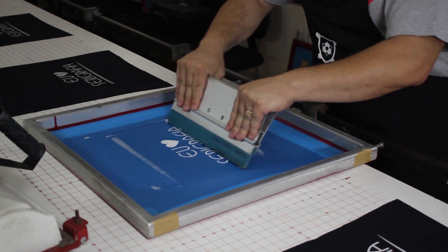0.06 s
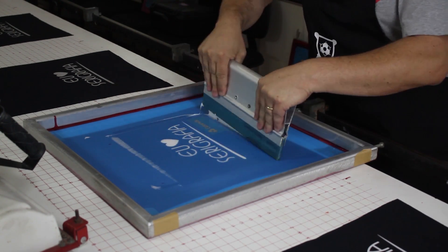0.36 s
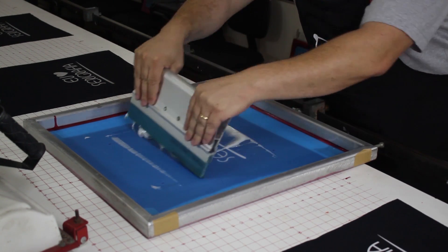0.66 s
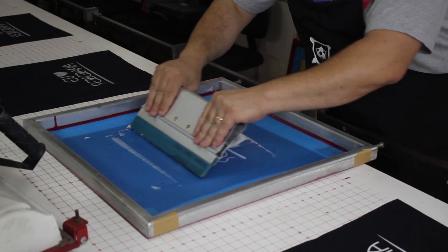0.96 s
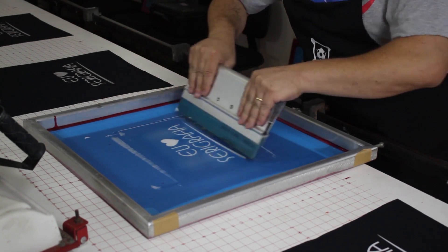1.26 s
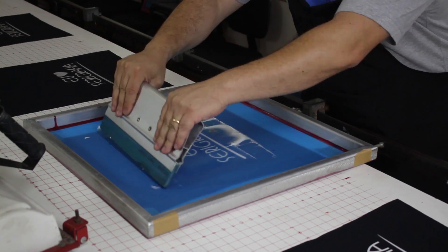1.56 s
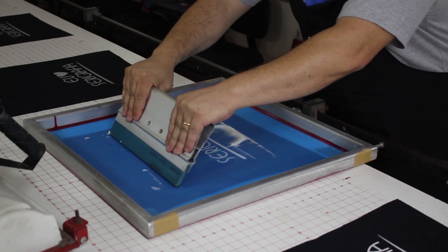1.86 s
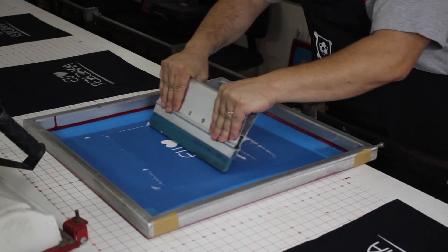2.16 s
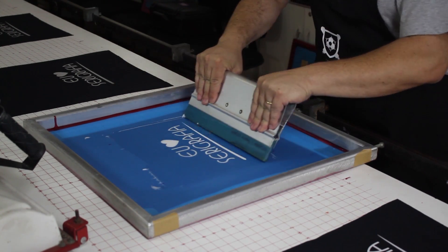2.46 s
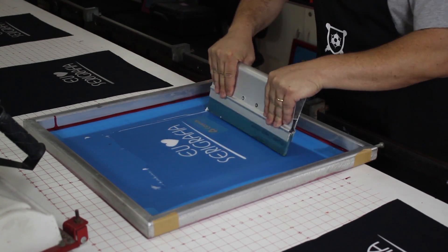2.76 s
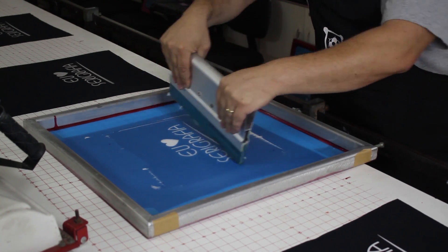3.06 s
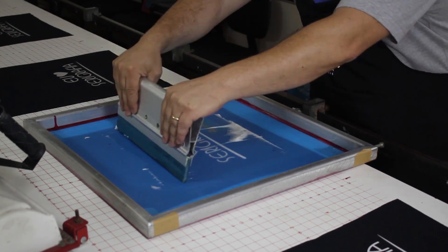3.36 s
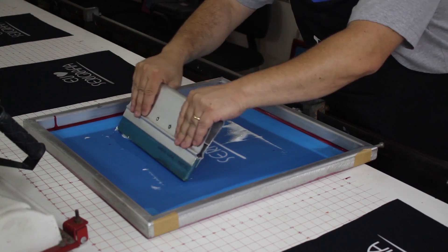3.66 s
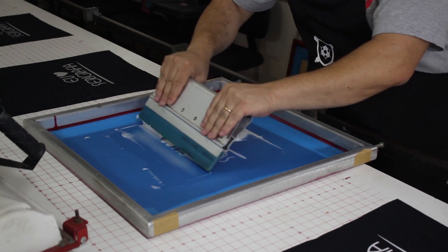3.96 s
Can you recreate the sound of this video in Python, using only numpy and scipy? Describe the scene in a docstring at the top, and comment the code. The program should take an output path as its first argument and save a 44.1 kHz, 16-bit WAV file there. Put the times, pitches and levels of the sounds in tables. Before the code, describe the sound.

Gliding rubber squeaks come from a squeegee rubbing back and forth on screen mesh, broken by low thumps and a knock. Softer squeaks follow, centred in a slightly echoing workshop with a faint motor hum and whine.

```python
"""A rubber squeegee is pushed and pulled over the taut mesh of a printing screen in a workshop.
The blade first sticks and slips in gliding squeaks, rasping over the weave. At the turns it thumps
the screen like a drum: at 0.8 s, then twice near 1.65 s, with a faint, high squeak between.
A run of squeaks falls from 2.1 s, with a thump and knock at 2.4 s; softer ones follow to the end.
Throughout, a motor hums and whines, and the room rings after every stroke."""
import sys
import numpy as np
from scipy import signal
from scipy.fft import rfft, irfft
from scipy.io import wavfile

SR = 44100
rng = np.random.default_rng(int(sys.argv[2]) if len(sys.argv) > 2 else 0)


def transcribe(u):
    """Save the signal u as a 16-bit wav file named by the first command-line argument.

    u: samples, shape (n,) or (channels, n), limited to [-1, 1]; the rate is SR.
    q: integer samples, one column per channel.
    """
    v = np.clip(np.atleast_2d(u).T, -1, 1)
    q = np.round(v * 32767).astype(np.int16)
    wavfile.write(sys.argv[1], SR, q)


N = 176400

# Blade strokes: overtone_db, half_pitch_db, rasp_db, roughness (0-1), [time_s, pitch_hz, level_db]
BLADE_STROKES = [ (-11.5, -21, -11.5, 1, [(0, 2720, -28), (.02, 2760, -27), (.04, 2480, -28),
                 (.056, 2540, -27), (.068, 2300, -33), (.079, 3020, -29), (.112, 2860, -26),
                 (.135, 2350, -27), (.158, 2400, -34), (.168, 1620, -28), (.19, 2270, -30),
                 (.22, 2230, -31), (.26, 2650, -31), (.303, 2480, -31), (.33, 1780, -42)]),
                 (-17, -27, -8, .6, [(.725, 2600, -49), (.755, 2430, -42), (.778, 2150, -40),
                 (.802, 1500, -40)]), (-8, -17, -3.5, 1, [(.95, 1390, -49), (1.02, 2350, -47.5),
                 (1.064, 3330, -45), (1.1, 3650, -40), (1.135, 3880, -35), (1.185, 3600, -40),
                 (1.235, 2300, -45)]), (-10, -20, -5, .5, [(1.9, 1500, -56), (2.02, 1680, -46),
                 (2.06, 1830, -44), (2.108, 2110, -39)]), (-11, -26, -16, .9, [(2.108, 2100, -35),
                 (2.121, 2160, -25), (2.138, 2260, -26), (2.145, 1900, -31), (2.158, 2030, -26),
                 (2.19, 2080, -27), (2.2, 2360, -28), (2.22, 2390, -25.5), (2.255, 2120, -35)]),
                 (-13, -25, -13.5, .7, [(2.264, 1480, -30), (2.277, 1900, -27), (2.29, 1730, -31),
                 (2.322, 1560, -33), (2.347, 2050, -32), (2.365, 1780, -30), (2.398, 1600, -27),
                 (2.412, 1300, -31), (2.44, 1750, -29), (2.474, 1100, -30), (2.502, 1660, -29),
                 (2.54, 1300, -31), (2.577, 1440, -30), (2.592, 1020, -34), (2.612, 660, -41)]),
                 (-19, -10, -4.5, 1, [(2.62, 750, -46), (2.66, 1350, -42), (2.696, 2050, -34),
                 (2.73, 1300, -46)]), (-10, -22, -8, .5, [(2.968, 2650, -47), (3.015, 2950, -42),
                 (3.04, 3050, -52)]), (-6, -7, -6, 1, [(3.133, 3820, -44), (3.148, 4000, -41.5),
                 (3.183, 3700, -44), (3.198, 3170, -48), (3.218, 3020, -46), (3.252, 3200, -44),
                 (3.285, 2550, -56), (3.312, 1820, -45), (3.37, 1450, -50)]),
                 (-24, -30, -16, .25, [(3.8, 850, -49), (3.85, 1350, -43), (3.868, 1720, -35.5),
                 (3.9, 1990, -42.5), (3.97, 1520, -49)])]
JITTER_HZ, JITTER_RATE_HZ = 46, 220
FLUTTER_DB, FLUTTER_RATE_HZ = 4.1, 150
FUZZ_DB, FUZZ_RATE_HZ = -8, 420
CHATTER_DB, CHATTER_RATE_HZ = 7, 45
TOUCH_S, PARTIAL_STEP_DB = .005, -10
# Screen radiation of overtones, chatter and rasp: freq_hz, gain_db
SCREEN_RADIATION = [(2700, 0), (3700, -6.5), (4600, 1.5), (5300, .5), (6500, -7), (7500, -4), (9500, -10)]
# Rubber on the weave, slipping at RASP_REF_HZ: freq_hz, relative_db
RASP_SPECTRUM = [(200, 3), (700, 2.5), (2200, 11), (5000, 7), (16000, -4.5)]
RASP_REF_HZ, RASP_SHIFT_EXPONENT = 2300, 0.61
GRAIN_DB, GRAIN_RATE_HZ = 3.6, 330
# Light blade skims: start_s, length_s, level_db
BLADE_SWISHES = [(0.709, 0.07, -48.5), (1, 0.29, -45.5), (1.849, 0.31, -48), (2.62, .3, -51.5)]
SWISH_SLIP_HZ = 5960
# Blade landings on the mesh: start_s, level_db, pitch_hz, t60_s
LANDINGS = [(0.837, -13.5, 137, 0.079), (1.6463, -8.5, 157, 0.033), (1.6711, -4.5, 131, 0.067),
            (2.430, -17, 138, 0.055)]
# Screen modes: freq_hz, relative_db, t60_s
SCREEN_MODES = [(108.8, -20, 0.84), (172, -14.5, 0.32), (272.3, -16, 0.14)]
THUMP_RISE_S, FRAME_LOW_CUT_HZ = 0.0014, 108
# Handle knocks and blade ticks: start_s, level_db, centre_hz, width_oct, t60_s
TICK_BURSTS = [(.045, -33, 3400, .15, 0.022), (0.144, -24.5, 3150, 0.12, 0.019),
               (0.168, -32, 4000, 0.65, .05), (1.215, -33, 3980, 0.53, 0.083),
               (1.631, -38, 2500, 0.51, 0.045), (2.195, -30, 3040, 0.27, 0.024),
               (2.374, -27, 2470, .25, .03), (2.411, -38, 6100, 0.43, 0.033),
               (2.430, -17.5, 487, 0.39, 0.062), (2.431, -21.5, 2430, 0.66, 0.025),
               (2.774, -43, 6000, .33, .02), (2.966, -33.5, 6400, 1, 0.016)]
# Mesh rumble envelope: time_s, level_db
RUMBLE_LEVEL = [(0, -29), (.2, -31.5), (.35, -37), (.85, -42), (.9, -37.5), (1.04, -42.5), (1.6, -41),
                (1.75, -32.5), (1.94, -33), (2.06, -38), (2.35, -32.5), (2.6, -36.5), (3.5, -46),
                (3.78, -40)]
# Mesh rumble: freq_hz, relative_db
RUMBLE_SPECTRUM = [(30, -13), (70, 2.5), (110, 6.5), (220, 2), (400, 2.5), (700, -8.5), (1500, -21),
                   (5000, -38)]
# Motor hum and whine: freq_hz, level_db
MOTOR_LINES = [(119.6, -48), (178, -51), (242, -54), (435, -49), (2767, -57), (2826, -60)]
MOTOR_WAVER_DB, MOTOR_DRIFT_HZ = 2, .8
# Workshop air: freq_hz, relative_db
AIR_SPECTRUM = [(25, -26), (60, -1), (120, -23), (200, -2), (430, -0.5), (630, -1.5), (830, -7.5),
                (1270, -9.5), (2400, -19), (2830, -14), (3300, -22), (4800, -20), (7000, -28),
                (15500, -34.5)]
# Stereo hiss: freq_hz, relative_db
HISS_SPECTRUM = [(500, -15), (2000, -26.5), (6000, -1), (16000, -0.5)]
AIR_DB, HISS_DB = -37.5, -56
# Room decay: freq_hz, t60_s
ROOM_DECAY = [(100, 0.59), (1400, 0.74), (2600, 1), (3700, .9), (5500, 0.5)]
BLADE_SEND_DB, THUMP_SEND_DB, EARLY_DB = -7.5, -9, -10
BAND_LIMIT_HZ = 15750


def squeak(overtone_db, half_pitch_db, rasp_db, roughness, curve):
    """Stick-slip of the rubber edge: fluttering tone, overtones, fits of half-pitch chatter, rasp."""
    t = np.arange(N) / SR
    time_s, pitch_hz, level_db = np.transpose(curve)
    gate = np.clip(np.minimum(t - time_s[0], time_s[-1] - t) / TOUCH_S + 1, 0, 1)
    envelope = gate * amp(np.interp(t, time_s, level_db))
    slip_hz = np.interp(t, time_s, pitch_hz)
    jitter_hz = roughness * JITTER_HZ * wander(JITTER_RATE_HZ)
    phase = 2 * np.pi * np.cumsum(slip_hz + jitter_hz) / SR
    flutter = lambda: unit_rms(amp(roughness * FLUTTER_DB * wander(FLUTTER_RATE_HZ)))
    fuzz = roughness * amp(FUZZ_DB) * wander(FUZZ_RATE_HZ)
    partial = lambda ratio: amp(lookup(SCREEN_RADIATION, ratio * slip_hz)) * np.sin(ratio * phase)
    overtones = partial(2) + amp(PARTIAL_STEP_DB) * partial(3)
    halves = partial(1.5) + amp(PARTIAL_STEP_DB) * (partial(.5) + partial(2.5))
    chatter = unit_rms(amp(CHATTER_DB * np.tanh(wander(CHATTER_RATE_HZ))))
    tone = (flutter() + fuzz) * np.sin(phase)
    tone += flutter() * (amp(overtone_db) * overtones + amp(half_pitch_db) * chatter * halves)
    return envelope * (np.sqrt(2) * tone + amp(rasp_db) * rasp(pitch_hz.mean()))


def rasp(slip_hz):
    """Grainy rubbing on the weave, brighter with faster slip."""
    shift = (slip_hz / RASP_REF_HZ) ** RASP_SHIFT_EXPONENT
    rubbing = noise(lambda f: amp(lookup(RASP_SPECTRUM, f / shift) + lookup(SCREEN_RADIATION, f)))
    grain = unit_rms(amp(GRAIN_DB * wander(GRAIN_RATE_HZ)))
    return rubbing * grain


def swishes():
    """Blade skims the weave at low pressure: soft swells of bright rasp."""
    out = np.zeros(N)
    for start_s, length_s, level_db in BLADE_SWISHES:
        swell = np.sqrt(np.hanning(int(length_s * SR)))
        add(out, start_s, amp(level_db) * swell * rasp(SWISH_SLIP_HZ)[:len(swell)])
    return out


def thumps():
    """Damped push on the mesh, then longer screen modes; the open frame radiates no deep bass."""
    out, t = np.zeros(N), np.arange(SR) / SR
    attack = np.minimum(t / THUMP_RISE_S, 1)
    ring = sum(amp(db - 60 * t / t60_s) * np.sin(2 * np.pi * hz * t) for hz, db, t60_s in SCREEN_MODES)
    for start_s, level_db, pitch_hz, t60_s in LANDINGS:
        push = amp(-60 * t / t60_s) * np.sin(2 * np.pi * pitch_hz * t)
        add(out, start_s, amp(level_db) * attack * (push + ring))
    return signal.sosfilt(signal.butter(4, FRAME_LOW_CUT_HZ, "high", fs=SR, output="sos"), out)


def ticks():
    """Handle knocks or blade snaps free: short bursts of band noise."""
    out, t = np.zeros(N), np.arange(SR // 4) / SR
    attack = np.minimum(t / 0.0004, 1)
    for start_s, level_db, centre_hz, width_oct, t60_s in TICK_BURSTS:
        burst = noise(lambda f: np.exp(-.5 * (np.log2((f + 1) / centre_hz) / width_oct) ** 2))
        add(out, start_s, burst[:len(t)] * attack * amp(level_db - 60 * t / t60_s))
    return out


def rumble():
    """Mesh rumbles under the pressed, moving blade."""
    level_db = np.interp(np.arange(N) / SR, *np.transpose(RUMBLE_LEVEL))
    return amp(level_db) * coloured(RUMBLE_SPECTRUM)


def motor():
    """Hum and whine: sine lines wavering in level and pitch."""
    out, t = np.zeros(N), np.arange(N) / SR
    for freq_hz, level_db in MOTOR_LINES:
        rms = amp(level_db + MOTOR_WAVER_DB * wander(rate_hz=7.2))
        drift_cycles = MOTOR_DRIFT_HZ * np.cumsum(wander(rate_hz=4.5)) / SR
        out += np.sqrt(2) * rms * np.sin(2 * np.pi * (freq_hz * t + drift_cycles))
    return out


def air():
    """Steady workshop air, plus thin hiss in antiphase between the ears."""
    hiss = amp(HISS_DB) * coloured(HISS_SPECTRUM)
    return amp(AIR_DB) * coloured(AIR_SPECTRUM) + np.array([hiss, -hiss])


def room(x):
    """Five reflections off table and press, then a diffuse tail."""
    t = np.arange(SR) / SR
    onset = np.clip(t / 0.016 - .5, 0, 1)
    freq_hz, time_s, spectra = signal.stft(rng.standard_normal(SR) * onset, SR, nperseg=256)
    decay = amp(-60 * time_s / lookup(ROOM_DECAY, freq_hz)[:, None])
    response = signal.istft(spectra * decay, SR, nperseg=256)[1][:SR]
    response /= np.linalg.norm(response)
    for delay_s, sign in zip(rng.uniform(.003, 0.028, size=5), rng.choice([-1, 1], size=5)):
        response[int(delay_s * SR)] += sign * amp(EARLY_DB)
    return signal.fftconvolve(x, response)[:N]


def amp(db):
    """dB to gain."""
    return 10 ** (np.asarray(db) / 20)


def unit_rms(x):
    """Scale to rms 1."""
    return x / np.sqrt(np.mean(x ** 2) + 1e-20)


def lookup(table, at_hz):
    """Interpolate a table over log frequency."""
    freq_hz, value = np.transpose(table)
    return np.interp(np.log(at_hz + 1), np.log(freq_hz + 1), value)


def add(mix, start_s, sound):
    """Mix a sound in at start_s."""
    part = mix[max(round(start_s * SR), 0):][:len(sound)]
    part += sound[:len(part)]


def noise(gain):
    """Unit-rms noise shaped by gain(freq_hz)."""
    freq_hz = np.fft.rfftfreq(N, 1 / SR)
    return unit_rms(irfft(rfft(rng.standard_normal(N)) * gain(freq_hz), N))


def coloured(spectrum):
    """Unit-rms noise with a tabled spectral density."""
    return noise(lambda f: amp(lookup(spectrum, f)))


def wander(rate_hz):
    """Unit-rms random motion up to rate_hz."""
    return noise(lambda f: 1 / (1 + (f / rate_hz) ** 4))


def scene():
    """Blade and screen, centred in the room, over motor and air."""
    blade = sum(squeak(*stroke) for stroke in BLADE_STROKES) + swishes() + ticks()
    screen = thumps()
    room_send = amp(BLADE_SEND_DB) * blade + amp(THUMP_SEND_DB) * screen
    return blade + screen + rumble() + room(room_send) + motor() + air()


def record(dry):
    """Low-pass at the band limit."""
    low_pass = signal.firwin(511, BAND_LIMIT_HZ, window=("kaiser", 9), fs=SR)
    return signal.oaconvolve(dry, low_pass[None], "same")


dry = scene()
out = record(dry)
transcribe(out)
```